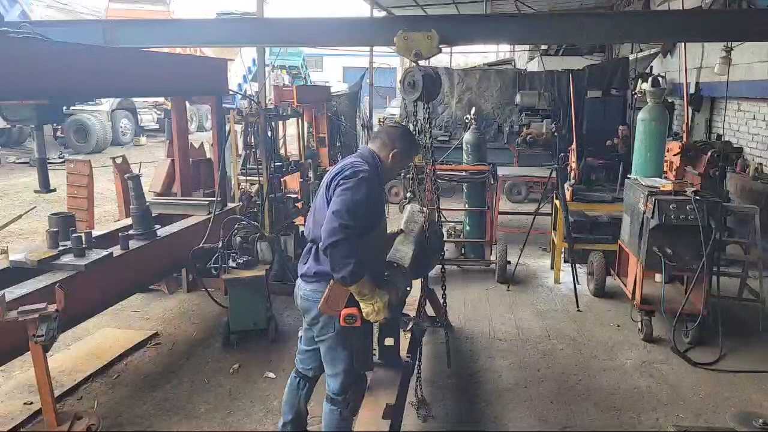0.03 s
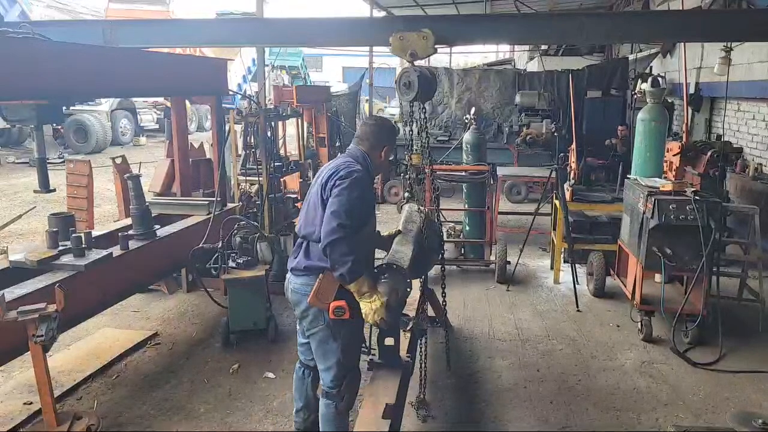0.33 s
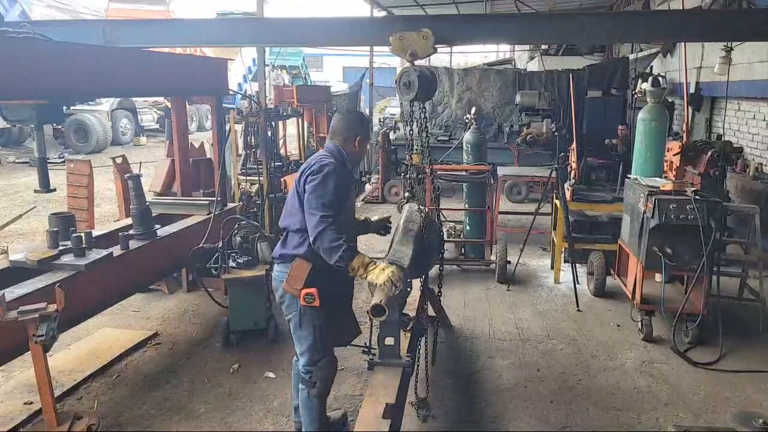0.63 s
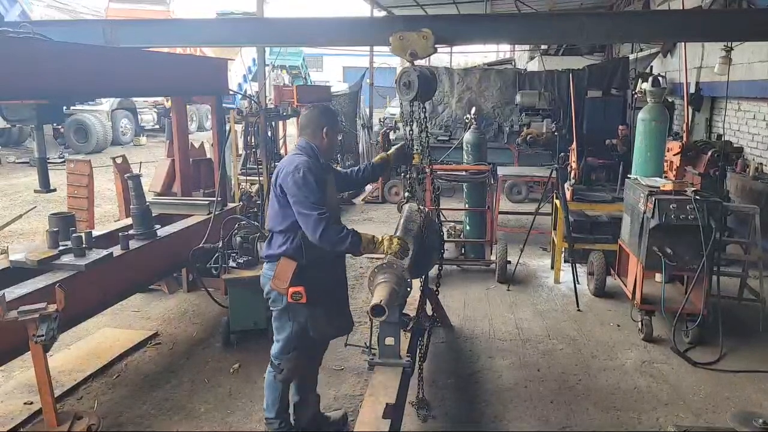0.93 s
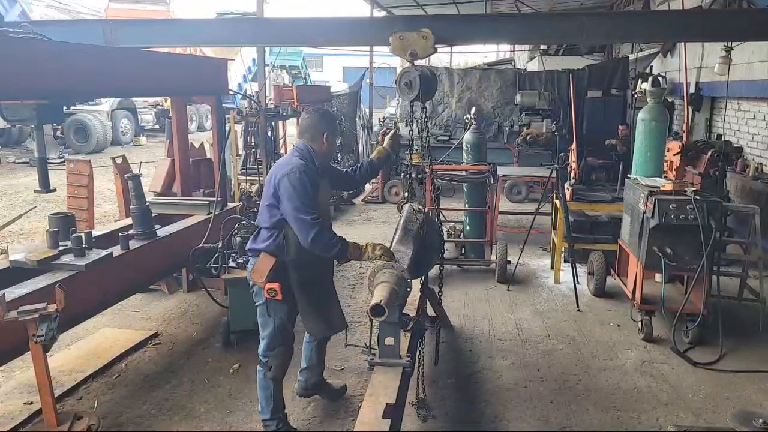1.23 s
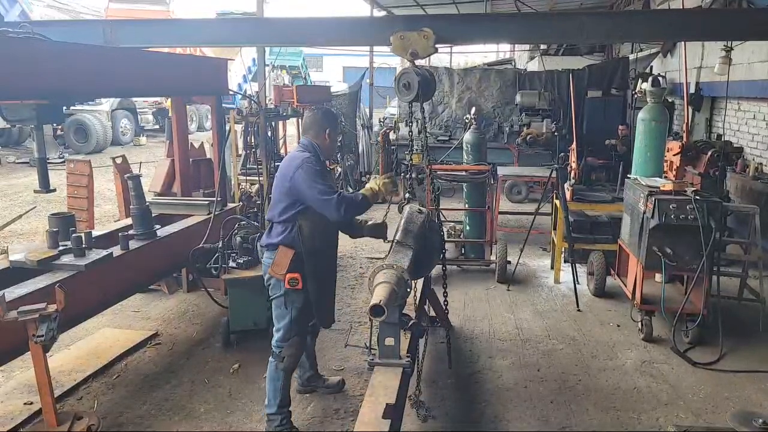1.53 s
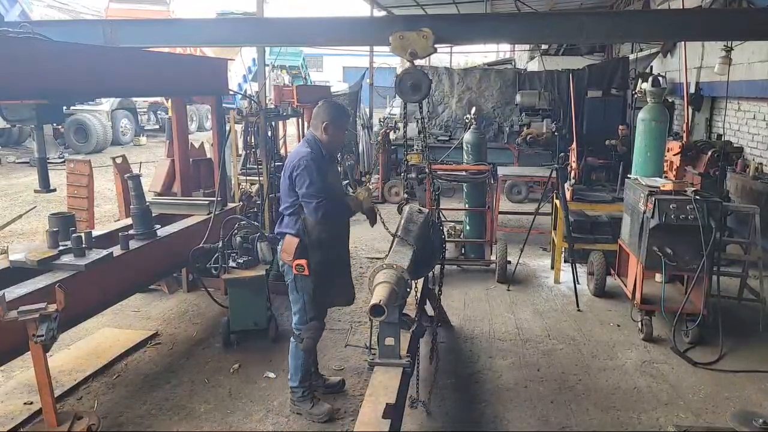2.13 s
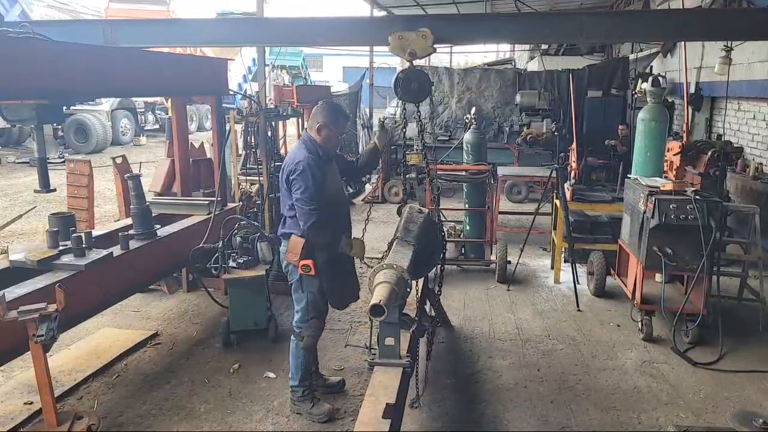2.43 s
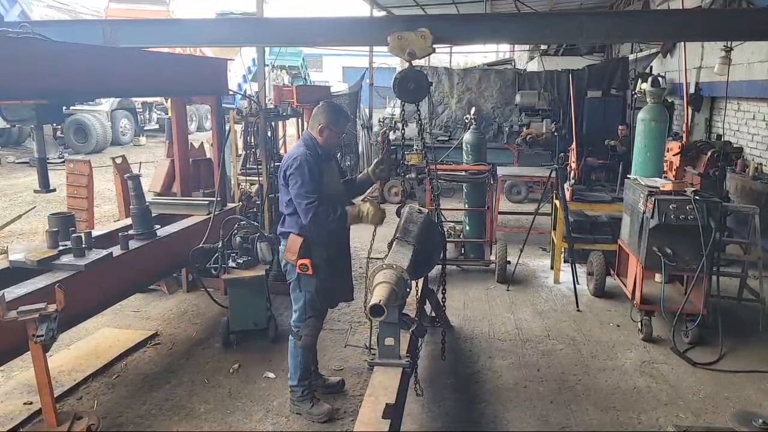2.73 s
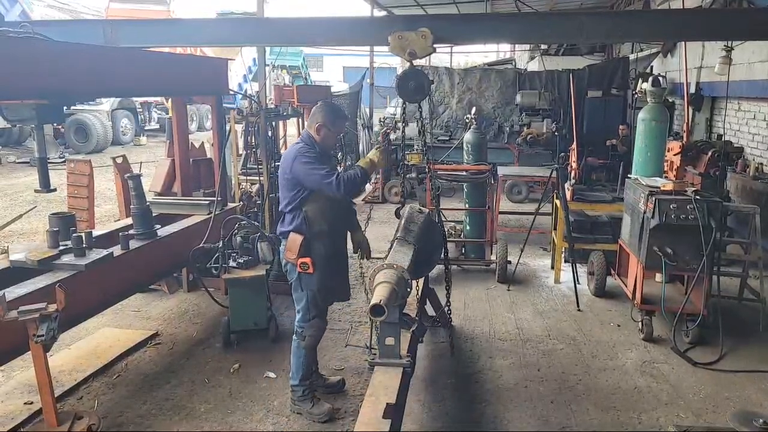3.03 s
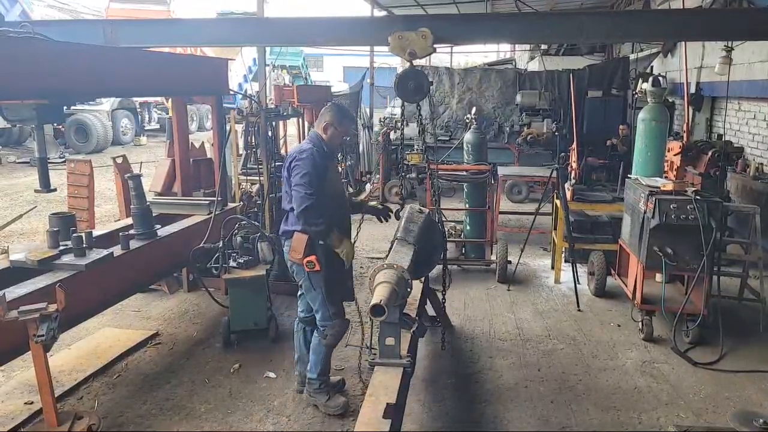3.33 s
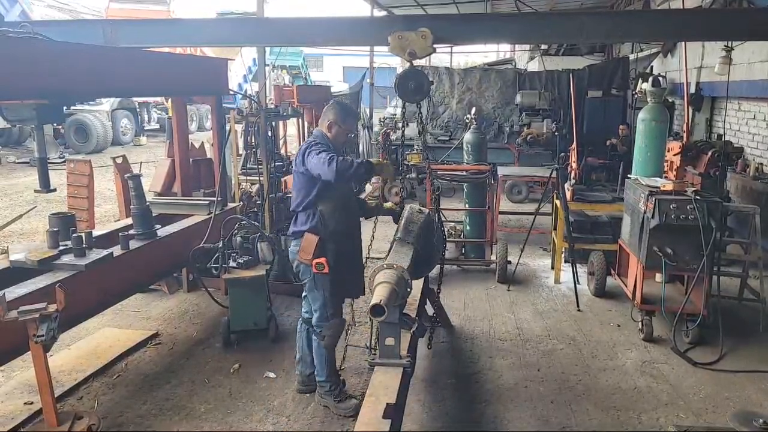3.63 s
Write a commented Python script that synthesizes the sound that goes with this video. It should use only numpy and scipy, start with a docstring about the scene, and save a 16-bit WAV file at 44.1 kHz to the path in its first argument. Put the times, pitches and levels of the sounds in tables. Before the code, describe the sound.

A hoist chain rattles and clinks in uneven pulls. Before it starts, a heavy steel part knocks on its stand, squeals briefly and scrapes into place. The open workshop adds a short echo over faint outdoor noise.

```python
"""A heavy steel part rocks on its stand, knocking and squealing, then scrapes into place.
Blows ring its modes; stick-slip makes it groan and hiss. A hoist's hand chain is grabbed, slaps over
the part and is hauled: links click together, rattle over the wheel casing and ring the hook.
A hard, open metal workshop answers briefly, over faint outdoor noise."""
import sys
import numpy as np
from scipy import signal
from scipy.fft import rfft, irfft
from scipy.io import wavfile
from scipy.ndimage import uniform_filter1d

SR = 44100
rng = np.random.default_rng(int(sys.argv[2]) if len(sys.argv) > 2 else 0)


def inscribe(sig):
    """Save sig as 16-bit PCM at rate SR to the path in sys.argv[1].

    A 1-D sig is mono; a 2-D sig holds one channel per row.
    Samples are clipped to [-1, 1] before scaling.
    """
    pcm = np.round(np.clip(np.atleast_2d(sig).T, -1, 1) * 32767)
    wavfile.write(sys.argv[1], SR, pcm.astype(np.int16))


N = 171990

# treble spectrum of a link contact: freq_hz, level_db
LINK_EDGE = [(3000, -31.5), (4800, 7.5), (6100, 6), (7600, -0.5), (8600, -2.5), (10500, -1), (15500, -7.5)]
LINK_HZ, LINK_CUT_HZ = 4113, 6570  # link on link is duller than a run over steel
CONTACTS_PER_S, CONTACT_SPREAD_DB = 480, 5


def amp(db):
    """Decibels to gain."""
    return 10 ** (np.asarray(db) / 20)


def unit(x):
    """Scale to energy 1."""
    return x / np.sqrt(np.sum(x ** 2))


def unit_rms(x):
    """Scale to rms 1."""
    return unit(x) * np.sqrt(len(x))


def decay(t60_s, size=30000):
    """Exponential decay."""
    return np.exp(-np.log(1000) * np.arange(size) / SR / t60_s)


def burst(t60_s, size=30000):
    """Decaying noise: many close modes struck at once."""
    return unit(rng.standard_normal(size) * decay(t60_s, size))


def through(x, response):
    """Convolve, keeping the input length."""
    return signal.fftconvolve(x, response)[:len(x)]


def colour(x, spectrum, size=2048):
    """Minimum-phase filter of unit energy; spectrum rows: freq_hz, level_db."""
    hz, db = np.array(spectrum, float).T
    bins_hz = np.fft.rfftfreq(size, 1 / SR)
    gain = amp(np.interp(np.log(bins_hz + 1), np.log(hz), db))
    cepstrum = irfft(np.log(gain))
    cepstrum[1:size // 2] *= 2
    cepstrum[size // 2 + 1:] = 0
    return through(x, unit(irfft(np.exp(rfft(cepstrum)))))


def lowpass(x, cut_hz):
    """Two-pole low-pass."""
    return signal.sosfilt(signal.butter(2, min(cut_hz, SR / 3), fs=SR, output="sos"), x)


def band(x, centre_hz, width_hz):
    """Four-pole band-pass."""
    edges_hz = [max(centre_hz - width_hz / 2, 10), centre_hz + width_hz / 2]
    return signal.sosfilt(signal.butter(2, edges_hz, "band", fs=SR, output="sos"), x)


def ring(modes, t60_s, tilt_db_per_oct=0, size=30000):
    """Modal impulse response; strengths vary with the spot struck."""
    t = np.arange(size) / SR
    tones = np.zeros(size)
    for hz, db in modes:
        gain = amp(db + tilt_db_per_oct * np.log2(hz) + 2 * rng.standard_normal())
        tones += gain * np.sin(2 * np.pi * (hz * t + rng.random()))
    return unit(tones * decay(t60_s, size))


def add(out, start_s, sound):
    """Mix a sound in at start_s."""
    i = max(int(start_s * SR), 0)
    out[i:i + len(sound)] += sound[:max(len(out) - i, 0)]


def envelope(curve, column, smooth_s=0.045):
    """Smoothed gain from one dB column of a timed curve; silent beyond its ends."""
    curve = np.array(curve)
    db = np.interp(np.arange(N) / SR, curve[:, 0], curve[:, column], left=-np.inf, right=-np.inf)
    return uniform_filter1d(amp(db), int(smooth_s * SR))


def contacts(rate_per_s, spread_db, window=1500):
    """Random impacts of uneven strength, their power levelled over a short window."""
    struck = rng.random(N) < rate_per_s / SR
    hits = struck * amp(spread_db * rng.standard_normal(N)) * rng.choice([-1, 1], N)
    return hits / np.sqrt(np.abs(uniform_filter1d(hits ** 2, window)) + 1e-9)


def yard(level_db=-61):
    """Faint, steady outdoor noise."""
    # freq_hz, level_db
    spectrum = [(25, -35), (55, 6), (165, 10), (700, 6.5), (4000, -14.5), (15000, -15)]
    return amp(level_db) * unit_rms(colour(rng.standard_normal(N), spectrum))


def squeals(width_hz=50):
    """Steel sliding on steel sings briefly on one rough note."""
    # start_s, length_s, pitch_hz, level_db
    notes = [(0.111, 0.092, 1917, -18.5), (0.264, 0.085, 2236, -37), (0.47, 0.15, 404, -25),
             (0.579, 0.1, 726, -29), (.585, .1, 3145, -39), (1.273, .13, 1288, -32),
             (2.909, 0.069, 687, -31)]
    out = np.zeros(N)
    for start_s, length_s, pitch_hz, level_db in notes:
        swell = np.hanning(int(length_s * SR))
        note = band(rng.standard_normal(N), pitch_hz, width_hz)[-len(swell):]
        add(out, start_s, amp(level_db) * swell * unit_rms(note))
    return out


def part_response(body_db=2.5):
    """One blow on the part: its modes plus the dense clatter of its body."""
    # freq_hz, level_db
    modes = [(293, -6), (398, -3.5), (530, -3), (835, 3.5), (918, 4), (988, 4.5), (1090, 3.5), (1360, -9.5),
             (1612, -6), (1950, -6.5)]
    # freq_hz, level_db
    body_spectrum = [(100, -33.5), (350, -1.5), (700, -7), (1000, -2.5), (1900, -12), (2400, -19.5),
                     (4200, -25.5), (6600, -16), (8000, -21.5), (15000, -8.5)]
    tones = ring(modes, t60_s=0.2)
    body = unit(colour(burst(t60_s=0.36), body_spectrum))
    return tones + amp(body_db) * body


def part_knocks(knock_gain_db=12):
    """The part chatters onto its stand and is later hit by the chain; the stand thumps under the load."""
    # start_s, level_db, cut_hz
    knocks = [(0.119, -7.5, 3050), (0.131, 4.5, 1720), (.139, 0, 3650), (.156, 1.5, 2600),
              (.164, 5.5, 1500), (.191, 4, 1170), (0.221, 5, 660), (.278, 3.5, 854), (.287, 6.5, 794),
              (.310, 5, 800), (1.405, 1.5, 3000), (1.415, 8, 2560)]
    # start_s, level_db
    thumps = [(0.283, -1.5), (0.308, 2), (1.412, -2.5), (1.447, -10)]
    # freq_hz, level_db
    thump_spectrum = [(30, -32.5), (65, 5.5), (160, 22), (600, -33)]
    out = np.zeros(N)
    for start_s, level_db, cut_hz in knocks:
        add(out, start_s, amp(knock_gain_db + level_db) * lowpass(part_response(), cut_hz))
    for start_s, level_db in thumps:
        add(out, start_s, amp(level_db) * unit(colour(burst(t60_s=0.13), thump_spectrum)))
    return out


def part_scrape(groan_gain_db=-9.5):
    """Stick-slip makes the part groan while the rough faces hiss."""
    # time_s, groan_db, hiss_db
    push = [(0.425, -18, -38.5), (0.47, -20, -38), (0.535, -20, -43.5), (0.61, -19.5, -33.5),
            (0.67, -26.5, -39.5), (0.72, -62, -53.5), (0.93, -55, -92)]
    slips = contacts(rate_per_s=330, spread_db=0.5)
    # freq_hz, level_db
    hiss_spectrum = [(700, -9.5), (1450, 9), (2300, -4.5), (4200, -0.5), (5100, -7), (6200, -5.5),
                     (7600, -14), (9300, -12.5), (15000, -28)]
    groan = unit_rms(lowpass(through(slips, part_response()), cut_hz=610))
    hiss = unit_rms(colour(through(slips, burst(t60_s=0.068)), hiss_spectrum))
    return amp(groan_gain_db) * groan * envelope(push, column=1) + hiss * envelope(push, column=2)


def link_shape(rise_s, size=600):
    """Envelope of a short link click: quick rounded rise, fast decay."""
    u = np.arange(size) / SR / rise_s
    return (u * np.exp(1 - u)) ** 2


def link_click(rise_s, scatter=0.069):
    """One link's short note; pitch varies from link to link."""
    shape = link_shape(rise_s)
    pitch_hz = LINK_HZ * (1 + scatter * rng.standard_normal())
    return shape * np.sin(2 * np.pi * pitch_hz * np.arange(len(shape)) / SR)


def chain_snaps(rise_s=0.00057, crack_db=-15.5):
    """Single links snap tight: a hard click with a bright crack."""
    # start_s, level_db
    snaps = [(1.15, -35), (1.1798, -26), (1.2757, -11), (1.3103, -8), (1.3199, -1.5), (1.3566, -2),
             (1.6287, -0.5), (1.735, -4.5), (1.7519, -7), (1.9287, -18.5), (1.969, -4), (2.1209, -11.5),
             (2.3211, -12), (2.486, -7), (2.5302, -3), (2.873, -5), (2.894, -2.5), (2.9478, -3.5),
             (2.9989, -17), (3.0286, -11), (3.0547, -5.5), (3.246, -2), (3.272, -6), (3.296, -7),
             (3.32, -5), (3.3399, 0), (3.5602, -2.5), (3.595, -14.5), (3.6283, -6), (3.71, -13)]
    out, shape = np.zeros(N), link_shape(rise_s)
    for start_s, level_db in snaps:
        noise = rng.standard_normal(len(shape)) * shape
        crack = lowpass(colour(noise, LINK_EDGE), LINK_CUT_HZ)
        add(out, start_s, amp(level_db) * (link_click(rise_s) + amp(crack_db) * crack))
    return out


def chain_motion(attack_s=0.01, release_s=0.019):
    """Gains of bass, casing, links and edge: the steady haul plus short runs over steel."""
    # time_s, casing_db, links_db
    haul = [(2.32, -35.5, -22), (3.52, -33.5, -17.5), (3.76, -44.5, -30.5)]
    # start_s, hold_s, bass_db, casing_db, links_db, edge_db
    runs = [(1.262, 0.13, -46.5, -26, -14.5, -30.5), (1.352, 0.039, -35.5, -20.5, -21, -29),
            (1.394, 0.11, -22.5, -23, -15, -31.5), (1.515, 0.046, -29.5, -23.5, -18, -25.5),
            (1.557, 0.074, -35.5, -33, -23, -44), (1.62, 0.064, -47, -30.5, -19, -38),
            (1.711, 0.042, -41.5, -34, -19.5, -34), (1.918, 0.38, -52.5, -49, -37, -56),
            (2.109, 0.088, -66, -44, -28.5, -45.5), (2.37, 0.084, -71, -24.5, -22.5, -36),
            (2.493, 0.098, -38.5, -28, -20, -44), (2.844, 0.15, -77, -35, -19.5, -40.5),
            (2.98, 0.12, -34.5, -31, -44, -41.5), (3.214, 0.072, -72, -44.5, -17.5, -45),
            (3.417, 0.1, -39.5, -33.5, -19, -35), (3.77, 0.14, -45.5, -36, -36.5, -44)]
    t = np.arange(N) / SR
    casing, links = envelope(haul, column=1), envelope(haul, column=2)
    bass = amp(-11) * casing
    power = np.array([bass, casing, links, np.zeros(N)]) ** 2
    for start_s, hold_s, *levels_db in runs:
        attack = np.clip((t - start_s) / attack_s, 0, 1)
        release = np.exp(-np.maximum(t - start_s - hold_s, 0) / release_s)
        power += np.outer(amp(levels_db), attack * release) ** 2
    return np.sqrt(power)


def link_jingle(scatter=0.0263):
    """One link's upper modes, slightly detuned from its neighbours'."""
    # freq_hz, level_db
    overtones = [(6150, 3), (8520, 6.5), (9550, 5), (11700, -5)]
    stretch = 1 + scatter * rng.standard_normal()
    return ring([(hz * stretch, db) for hz, db in overtones], t60_s=0.033)


def chain_rattle(link_count=24, grit_s=0.006):
    """A stream of contacts rings the links, the wheel casing and the steel under the chain."""
    # chain on steel: freq_hz, level_db
    bass_spectrum = [(40, -21.5), (150, -10), (400, -1), (950, 7), (1600, -12.5), (2500, -46)]
    # freq_hz, level_db
    casing_spectrum = [(600, -23.5), (1250, 1), (2500, 5), (3400, 8), (6500, -47.5)]
    # freq_hz, level_db
    casing_modes = [(1270, 0), (1620, 3), (1940, 6), (2340, 4), (2570, 16), (3290, -2)]
    bass_gain, casing_gain, links_gain, edge_gain = chain_motion()
    hits = contacts(CONTACTS_PER_S, CONTACT_SPREAD_DB)
    struck_link = rng.integers(0, link_count, N)
    hits_by_link = [hits * (struck_link == k) for k in range(link_count)]
    clicks = unit_rms(sum(through(own, link_click(rise_s=0.0012)) for own in hits_by_link))
    jingle = unit_rms(sum(through(own, link_jingle()) for own in hits_by_link))
    # each contact leaves a short puff of noise
    grit_power = signal.lfilter([1], [1, -np.exp(-1 / (SR * grit_s))], hits ** 2)
    grit = unit_rms(np.sqrt(grit_power) * rng.standard_normal(N))
    bass = amp(3) * unit_rms(colour(grit, bass_spectrum))
    casing_drive = grit * casing_gain
    casing_ring = through(casing_drive, ring(casing_modes, t60_s=0.066))
    casing = colour(casing_drive, casing_spectrum) + amp(-5) * casing_ring
    edge = colour(grit, LINK_EDGE) + amp(-3) * jingle
    links = amp(-5.5) * clicks + amp(-17) * lowpass(edge, LINK_CUT_HZ)
    return bass * bass_gain + casing + links * links_gain + edge * edge_gain


def chain_slides(from_hz=3500, to_hz=1568, width_hz=530):
    """The clatter sinks in pitch as more links drop onto the steel."""
    # start_s, length_s, level_db
    slides = [(1.267, .16, -23), (2.326, 0.11, -22)]
    out = np.zeros(N)
    for start_s, length_s, level_db in slides:
        size = int(length_s * SR)
        hits = contacts(CONTACTS_PER_S, CONTACT_SPREAD_DB)
        clatter = unit_rms(lowpass(hits, width_hz / 2)[-size:])
        centre_hz = np.geomspace(from_hz, to_hz, size)
        carrier = np.sin(2 * np.pi * np.cumsum(centre_hz) / SR)
        swell = np.sqrt(np.hanning(size))
        add(out, start_s, amp(level_db) * swell * clatter * carrier)
    return out


def chain(after_ring_db=-15):
    """Rattle, snaps and slides, plus the after-ring of the hanging links."""
    links = chain_rattle() + chain_snaps() + chain_slides()
    after_ring = through(links, band(burst(t60_s=0.11), LINK_HZ, width_hz=780))
    return links + amp(after_ring_db) * unit_rms(after_ring) * np.std(links)


def hook(t60_s=0.082):
    """Short runs of links brush the hook and ring it."""
    # start_s, level_db, length_s, tilt_db_per_oct
    brushes = [(2.129, -26.5, 0.04, -0.5), (2.604, -28, 0.06, -5), (2.656, -23.5, 0.074, 0),
               (2.745, -33, 0.11, -5.5), (3.247, -19.5, 0.023, 47), (3.789, -27.5, 0.036, -1)]
    # freq_hz, level_db
    modes = [(985, -14), (1045, -4), (2310, -8), (2800, -9), (3300, -2)]
    out = np.zeros(N)
    for start_s, level_db, length_s, tilt_db_per_oct in brushes:
        response = ring(modes, t60_s, tilt_db_per_oct)
        touching = np.arange(len(response)) < length_s * SR
        hits = contacts(CONTACTS_PER_S, spread_db=7.5)[:len(response)] * touching
        add(out, start_s, amp(level_db) * np.sqrt(length_s * SR) * unit(through(hits, response)))
    return out


def workshop(x, early_db=-10, tail_db=-21.5, predelay_s=0.004):
    """Direct sound, early reflections from floor and machines, then a thin tail."""
    low_tail = unit(lowpass(burst(t60_s=0.46), cut_hz=1500))
    tail = low_tail / 2 + burst(t60_s=0.89)
    response = amp(early_db) * burst(t60_s=0.13) + amp(tail_db) * tail
    return x + through(x, np.pad(response, (int(predelay_s * SR), 0)))


def scene():
    """All sources in the workshop, over the yard noise; mono."""
    sources = part_knocks() + part_scrape() + squeals() + chain() + hook()
    return (workshop(sources) + yard())[None]


def record(dry, low_hz=48, top_hz=16000):
    """Round the highest peaks; cut the deepest bass and the top."""
    rounded = dry / (1 + dry ** 6) ** (1 / 6)
    bass_cut = signal.sosfilt(signal.butter(6, low_hz, "high", fs=SR, output="sos"), rounded)
    return signal.sosfilt(signal.ellip(8, .2, 80, top_hz, fs=SR, output="sos"), bass_cut)


dry = scene()
out = record(dry)
inscribe(out)
```